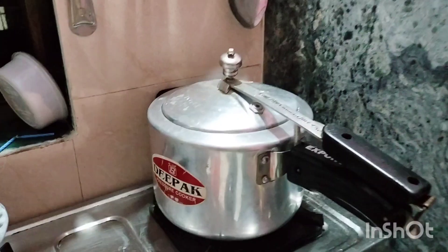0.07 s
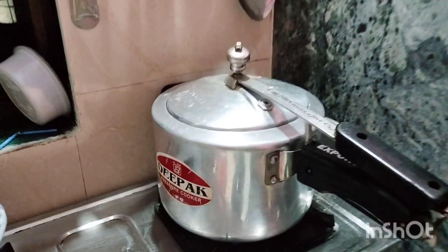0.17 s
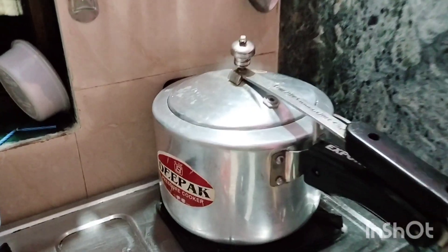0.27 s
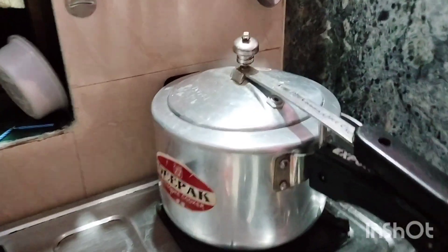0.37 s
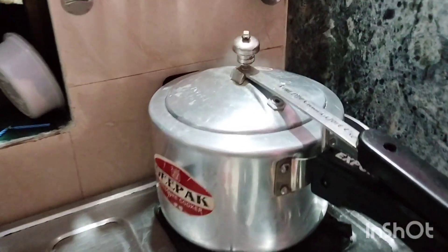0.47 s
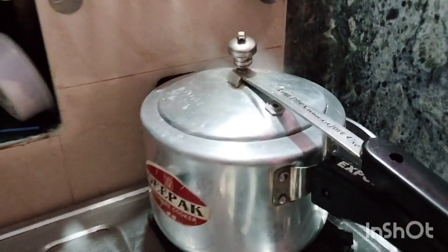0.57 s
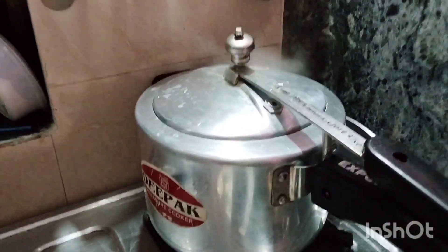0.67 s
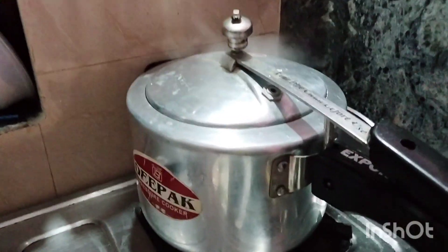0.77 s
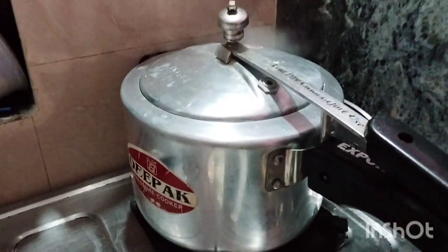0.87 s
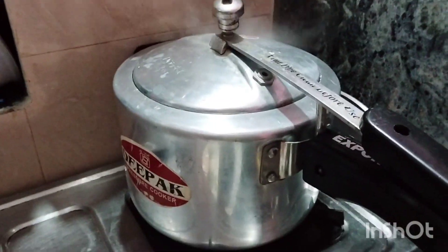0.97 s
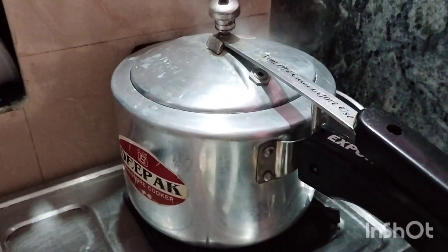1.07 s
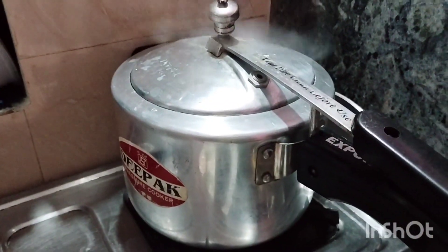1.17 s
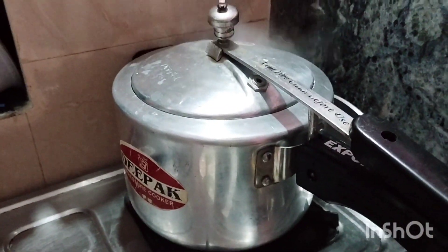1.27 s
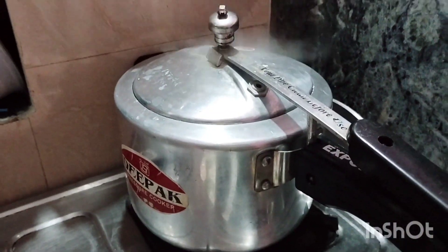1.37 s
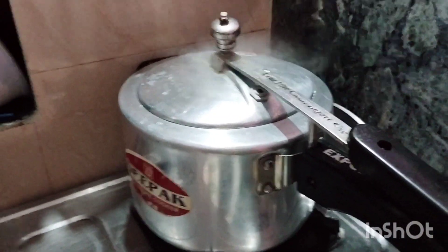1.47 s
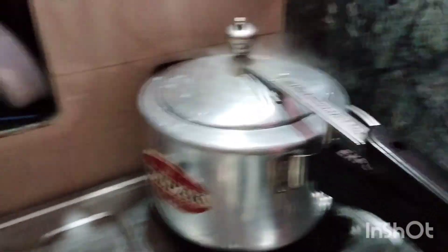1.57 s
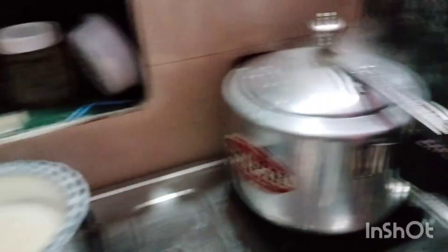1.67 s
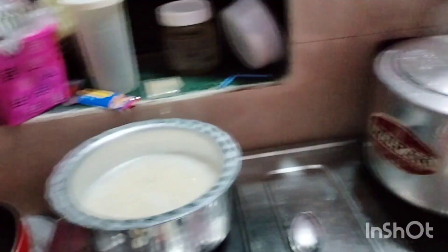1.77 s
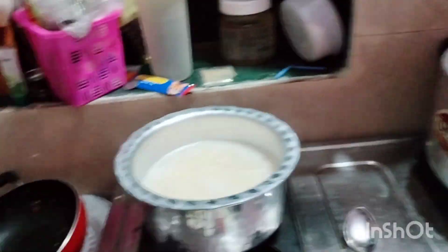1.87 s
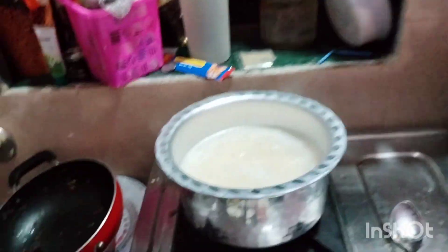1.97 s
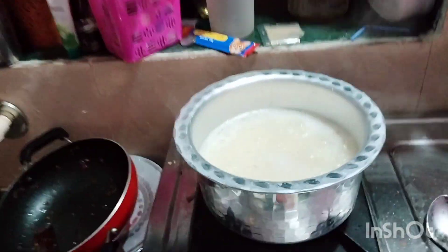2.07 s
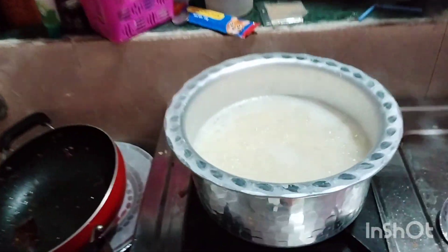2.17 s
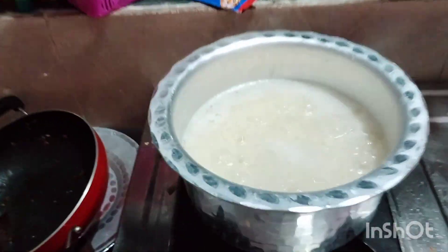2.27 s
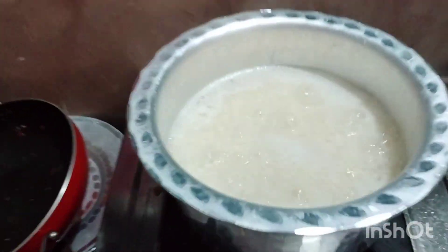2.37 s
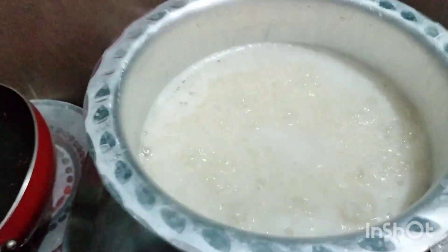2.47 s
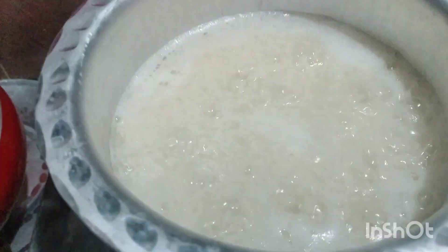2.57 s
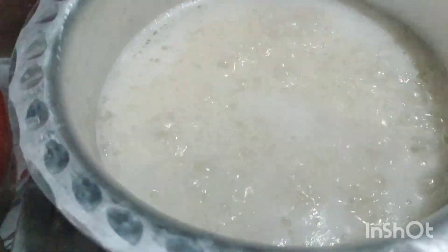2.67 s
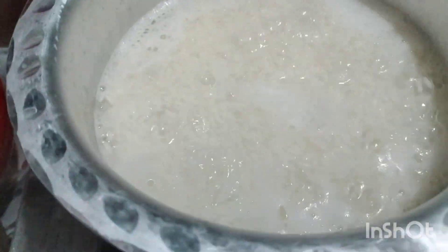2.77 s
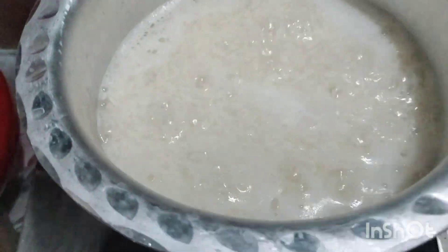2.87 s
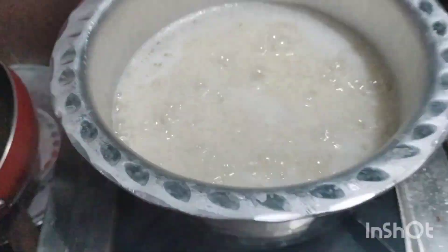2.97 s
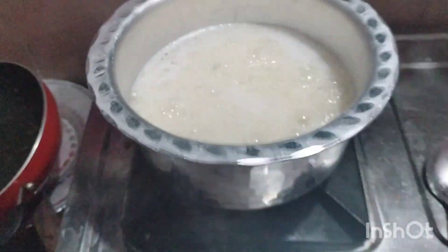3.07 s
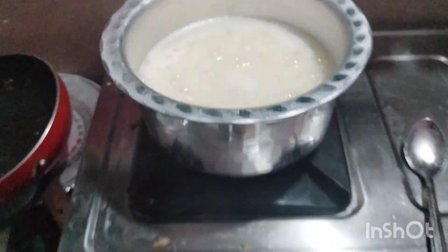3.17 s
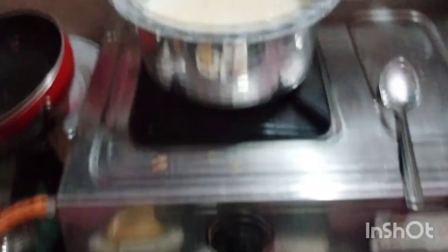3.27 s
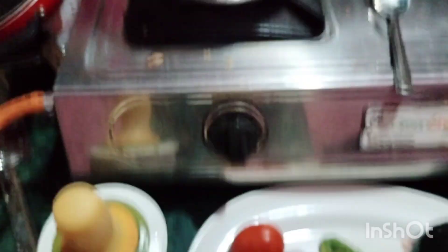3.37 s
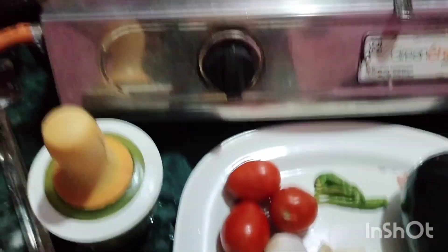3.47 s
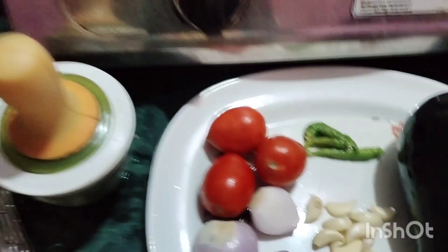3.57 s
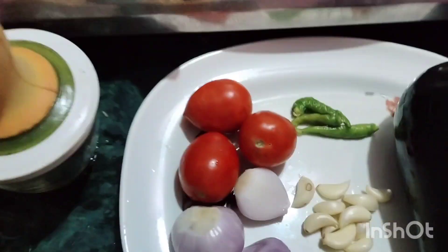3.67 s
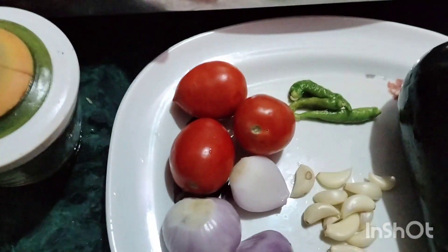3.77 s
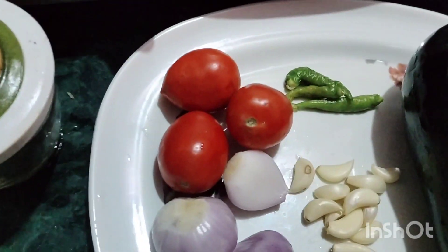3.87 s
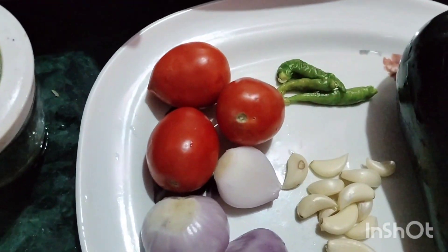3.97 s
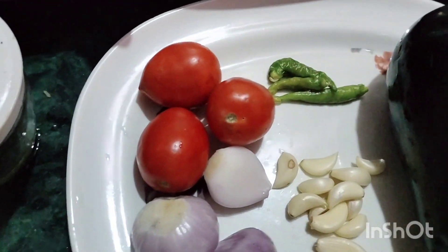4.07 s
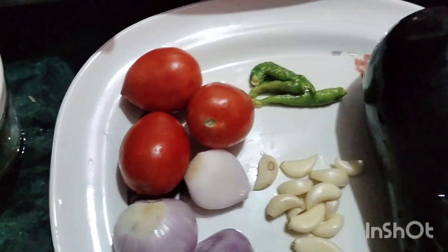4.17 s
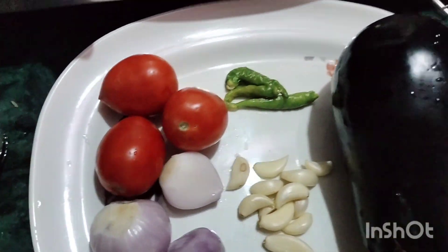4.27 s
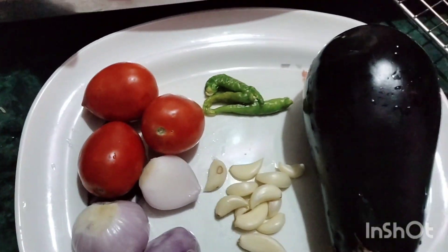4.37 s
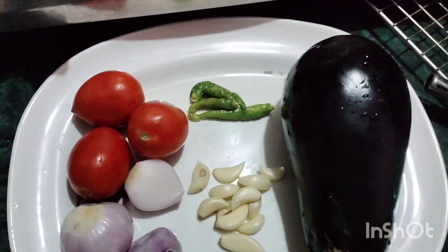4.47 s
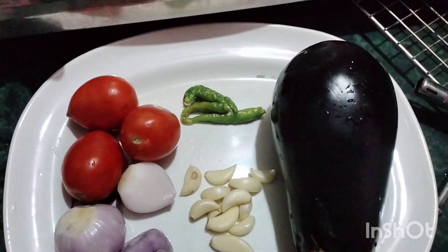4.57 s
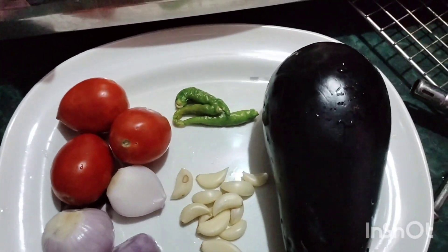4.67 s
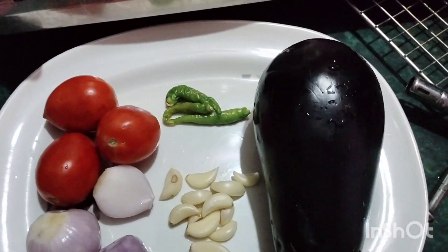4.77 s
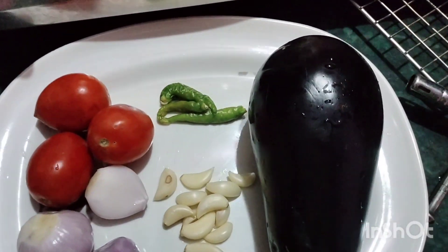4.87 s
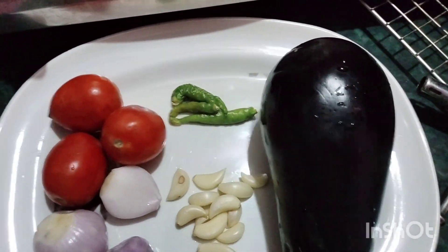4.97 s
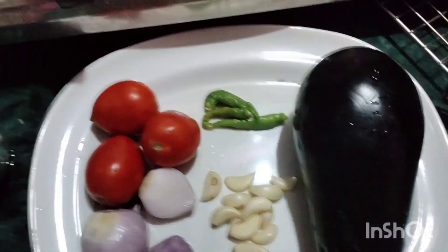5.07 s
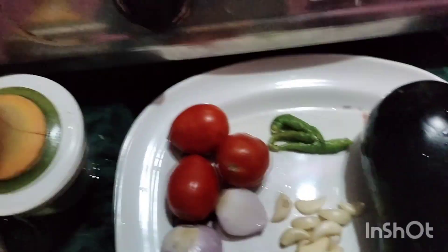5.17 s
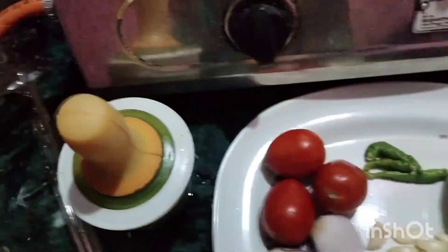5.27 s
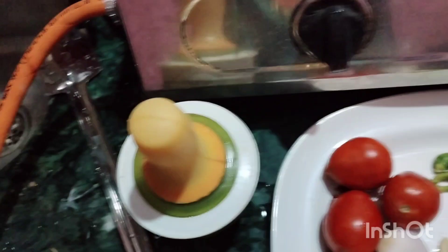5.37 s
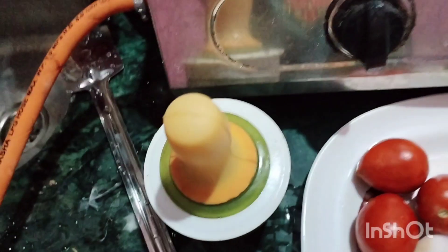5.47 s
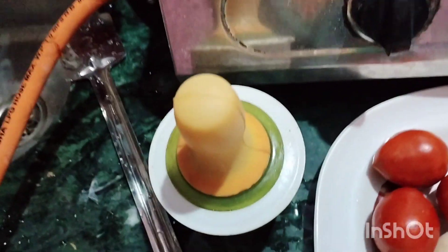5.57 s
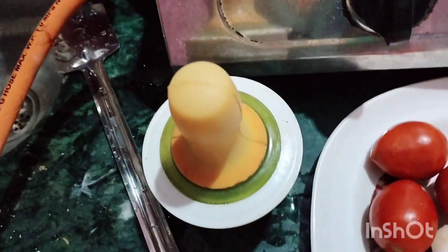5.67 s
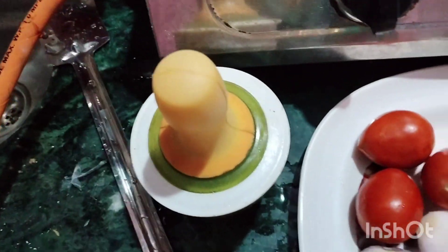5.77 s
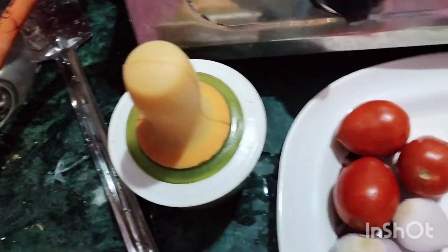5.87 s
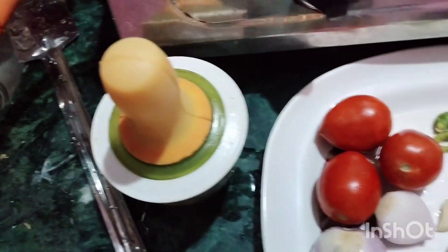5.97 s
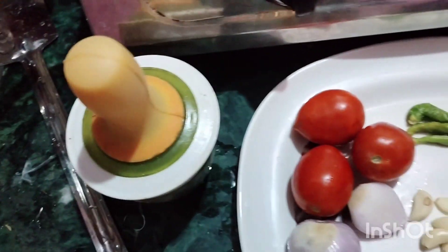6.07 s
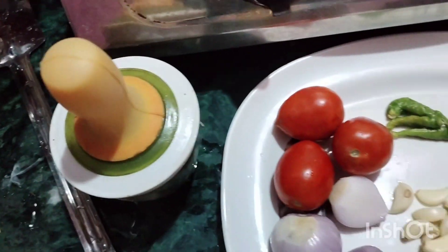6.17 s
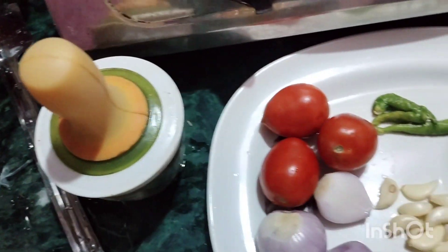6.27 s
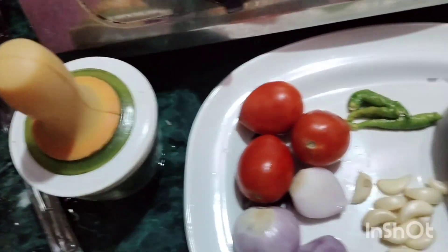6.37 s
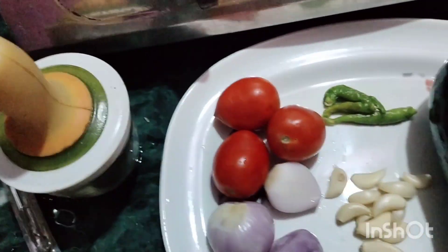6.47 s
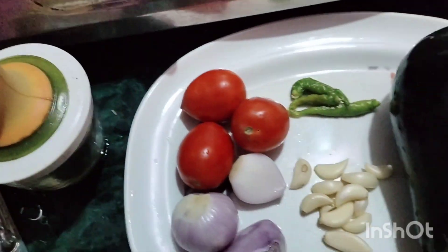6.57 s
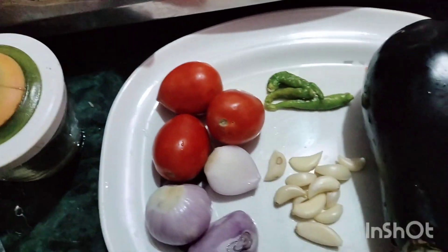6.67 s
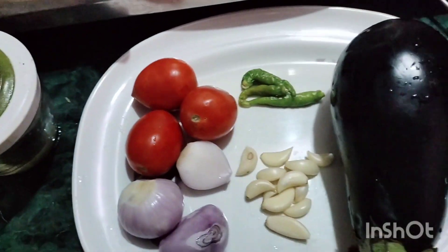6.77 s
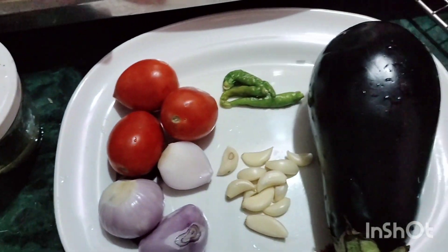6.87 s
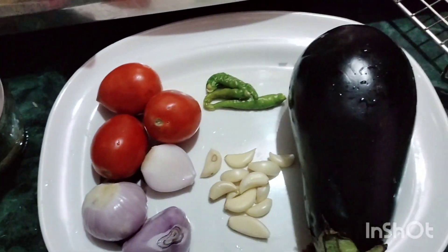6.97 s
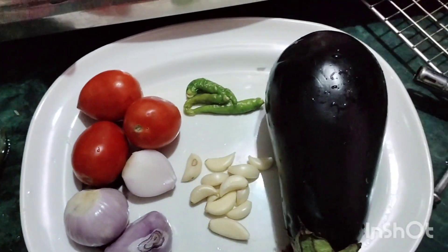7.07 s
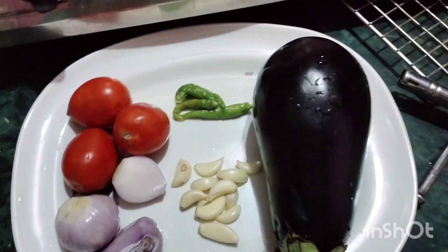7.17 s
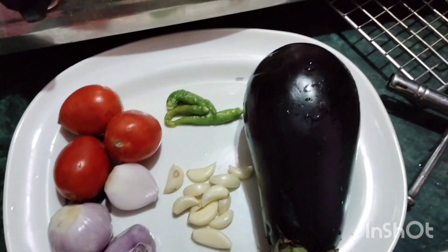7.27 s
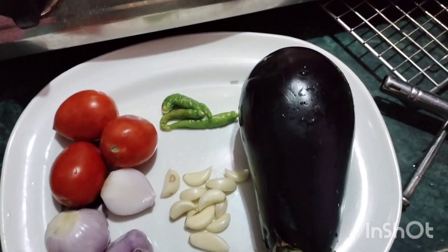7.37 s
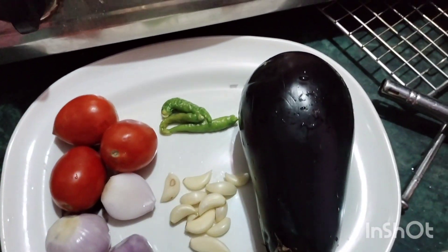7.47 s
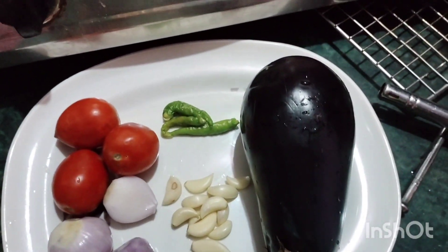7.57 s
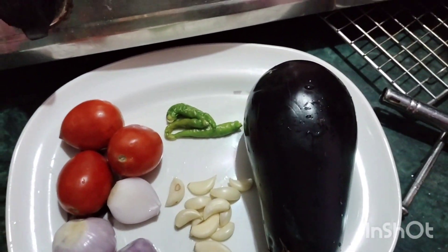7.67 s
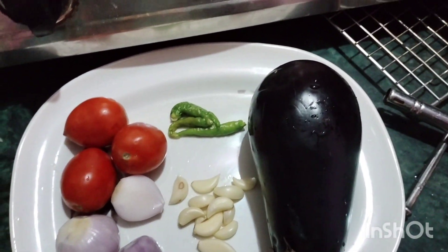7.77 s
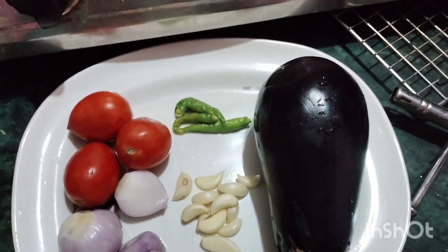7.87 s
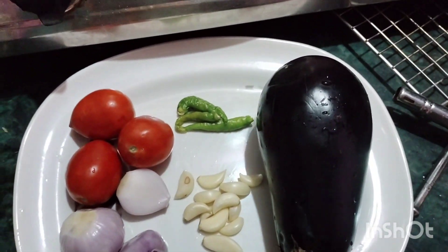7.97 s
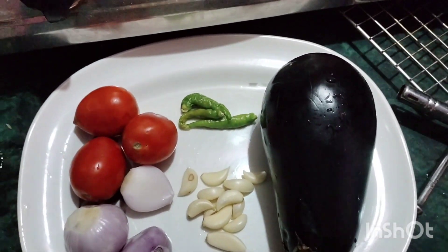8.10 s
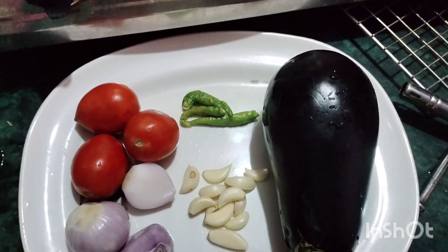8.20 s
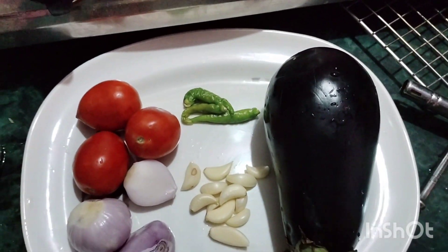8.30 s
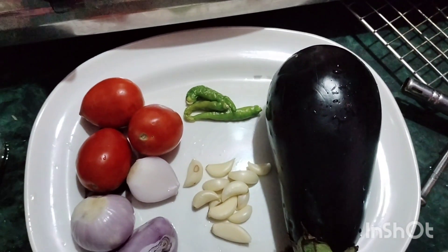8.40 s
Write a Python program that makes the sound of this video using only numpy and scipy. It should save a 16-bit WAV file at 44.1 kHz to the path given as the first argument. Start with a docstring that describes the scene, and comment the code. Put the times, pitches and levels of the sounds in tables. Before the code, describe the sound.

Bright, sputtering steam hiss from a pressure cooker valve, shifting in tone above a low burner rumble and soft handling bumps.

```python
"""A bright, sputtering hiss cuts in: steam jets from the weight valve of a pressure cooker, 30 cm away.
The microphone is a hand-held phone in a small tiled kitchen; it swings over a simmering pot and settles
above the counter, a metre off. Its two ports colour the hiss differently, and wall echoes shift as it
moves. Underneath are the low roar of gas burners, a fuzzy drone that swells in the second half
and a few soft bumps of the hand."""
import sys
import numpy as np
from scipy import signal
from scipy.fft import rfft, irfft
from scipy.io import wavfile
from scipy.ndimage import uniform_filter1d

SR = 44100
rng = np.random.default_rng(int(sys.argv[2]) if len(sys.argv) > 2 else 0)


def put_to_file(sound):
    """Save the sound as 16-bit audio at rate SR, in the file named by the first command-line argument."""
    columns = np.atleast_2d(sound).T  # one column per channel
    safe = np.clip(columns, -1, 1)
    whole_steps = np.round(safe * 32767)
    wavfile.write(sys.argv[1], SR, whole_steps.astype(np.int16))


N = 371983
FRAME, OVERLAP = 1024, 768  # samples
HZ = np.fft.rfftfreq(FRAME, 1 / SR)
TIME = np.arange(N) / SR
SOUND_M_PER_S = 343


def steam_jet(sputter_db=1.0, surge_db=0.43, spits_per_s=120, spit_s=0.0004, spit_db=-4, direct=.45):
    """Turbulent steam at two ports: the flow flutters under the weight, droplets spit through the gap."""
    flow = gain_of(sputter_db * wander(68) + surge_db * wander(35))
    drops = (rng.random(N) < spits_per_s / SR) * np.minimum(rng.exponential(1, N), 4)
    spits = gain_of(spit_db) * signal.lfilter([1], [1, -np.exp(-1 / (spit_s * SR))], drops)
    noise = rng.standard_normal((3, N))
    # the direct share reaches both ports, the rest is diffuse
    steam = np.sqrt(direct) * noise[2] + np.sqrt(1 - direct) * noise[:2]
    return steam * flow * np.sqrt((1 + spits) / (1 + spits.mean()))


# The jet's base colour at the open left port. Each row: frequency in Hz, level in dB per Hz.
LEFT_HISS = [(500, -85.5), (1100, -77.5), (1500, -73.5), (1900, -70.5), (2500, -66), (3300, -66),
             (4900, -66.5), (5700, -64.5), (7600, -66), (8300, -66.5), (9700, -65), (11400, -62.5),
             (13000, -64.5), (13600, -67), (15500, -65)]
# Steady narrow resonances on it. Each row: centre in Hz, width in Hz, lift in dB.
HISS_RINGS = [(7650, 150, 1.5), (10470, 180, 3.8), (12650, 170, 1.8)]
# Top treble beamed at the microphone. Each row: time in seconds, level in dB (neutral at flat_db).
TREBLE_BEAM = [(0.65, -34), (1.34, -31), (2.69, -38), (3.38, -35), (4.53, -38), (5.4, -36.5), (8.39, -42),
               (8.43, -38)]


def left_port(steam, flat_db=-36.5, glide_hz_per_m=7640):
    """Wide hiss with narrow rings; the top octave beams from the valve and a reflection peak glides."""
    t, spectra = to_frames(steam)
    distance_m, = follow(MIC_DISTANCE, t)
    top_db, = follow(TREBLE_BEAM, t)
    colour_db = spectrum(LEFT_HISS) + sum(db * bell(hz, width) for hz, width, db in HISS_RINGS)
    top = np.clip((HZ - 9500) / 6000, 0, 1)
    beam_db = (top_db - flat_db) * top
    body_db = by_distance(t, 1.5, -0.17) * (1 - top)
    low_mid_db = by_distance(t, -0.5, 3.3) * bell(1130, 180)
    glide_db = 1.5 * bell(glide_hz_per_m * distance_m, 1030)  # a grazing reflection lifts one band
    room_db = glide_db + standing_waves(t) + patches(t) + echoes(t)
    return to_sound(spectra * gain_of(colour_db + beam_db + body_db + low_mid_db + room_db))


# The jet's base colour at the right port. Each row: frequency in Hz, level in dB per Hz.
RIGHT_HISS = [(500, -75.5), (1050, -80.5), (1250, -74.5), (1800, -71), (2200, -63.5), (3000, -68.5),
              (4400, -70), (5600, -74.5), (6800, -88), (7800, -75), (8600, -67), (11400, -68.5),
              (12500, -77), (14000, -81), (15500, -85)]
# Thin valve whistles. Each row: centre in Hz, width in Hz, dB by the valve, dB over the counter.
VALVE_WHISTLES = [(2730, 20, -1, 4), (2976, 35, -2, 6.5), (3620, 35, 5, 1), (11204, 15, 4, 3)]
# A reflection cancels a band that rises as the phone turns.
# Each row: time in seconds, centre in Hz, gain in dB.
REFLECTION_NOTCH = [(1.6, 2960, -1), (2.0, 3100, 2), (4.6, 3200, -5), (5.0, 4200, -10), (5.6, 4600, -27),
                    (6.6, 4940, -15), (8.43, 5460, -9)]
# The phone's angle to the valve. Each row: time in seconds, extra path to the right port in metres.
RIGHT_EXTRA_PATH = [(0.63, 0.039), (1.55, 0.038), (1.9, -0.043), (2.4, -0.0795), (3.0, -0.091),
                    (3.7, -0.027), (6.3, -0.027), (7.0, 0.012)]


def right_port(steam):
    """Hiss and whistles heard through a duct, a little earlier or later than at the left port."""
    t, spectra = to_frames(steam)
    extra_m, = follow(RIGHT_EXTRA_PATH, t)
    notch_hz, notch_db = follow(REFLECTION_NOTCH, t)
    colour_db = spectrum(RIGHT_HISS) + right_treble(t)
    whistles_db = sum(by_distance(t, near, far) * bell(hz, width)
                      for hz, width, near, far in VALVE_WHISTLES)
    low_mid_db = by_distance(t, -0.5, 3.3) * bell(1430, 170)
    shade_db = by_turn(t, -4, 1.7) * bell(7060, 270)  # a dark band fills as the port faces the valve
    room_db = notch_db * bell(notch_hz, 290) + echoes(t)
    lag = np.exp(-2j * np.pi * HZ * extra_m / SOUND_M_PER_S)
    return to_sound(spectra * lag * gain_of(colour_db + whistles_db + low_mid_db + shade_db + room_db))


# The hiss's broad mid-treble hump sounds lower and weaker as the phone turns away, then partly returns.
# Each row: time in seconds, centre in Hz, lift in dB.
MID_TREBLE_HUMP = [(0.63, 3700, 15.5), (1.55, 3550, 14.5), (1.75, 2700, 7), (2.0, 2320, 4), (3.4, 2400, 4),
                   (4.4, 2600, 1), (6.3, 2950, 5.5), (6.9, 2740, 8.5), (7.3, 2980, 11.5), (8.43, 3167, 10)]
# The right port swings through the jet's beam. Each row: time and width in seconds, treble lift in dB.
BEAM_FLARES = [(1.95, 0.33, 3.5), (5.4, 0.51, 2)]


def right_treble(t):
    """A mid-treble hump and the duct's high resonance stand out (dB) when the port faces the cooker."""
    hump_hz, hump_db = follow(MID_TREBLE_HUMP, t)
    hump, resonance = bell(hump_hz, 640), bell(11180, 1360)
    treble = np.clip((HZ - 2000) / 3000, 0, 1)
    flare_db = sum(db * passing(t, s, width_s) for s, width_s, db in BEAM_FLARES)
    treble_db = by_distance(t, 1, -0.4) + flare_db * (1 - 0.78 * resonance)  # the resonance flares less
    return treble_db * treble + hump_db * hump + by_turn(t, 6, 1.13) * resonance


# Two lasting standing waves at the left port.
# Each row: centre in Hz, width in Hz, lift in dB by the valve, lift in dB over the counter.
STANDING_BANDS = [(4080, 250, 6, 2.5), (6390, 260, 3.5, 4)]
# Others, crossed on the way. Each row: time and width in seconds, centre in Hz, lift in dB.
CROSSED_BANDS = [(1.903, 0.078, 4260, 4.5), (2.02, 0.092, 6300, 5.5), (2.25, 0.22, 4630, 5),
                 (2.395, 0.08, 5540, 7), (2.75, 0.36, 6230, 6.5), (2.95, 0.34, 3520, 4), (4.0, .2, 7150, 8),
                 (4.05, 0.13, 6100, 4.5), (4.85, 0.51, 7600, 6), (4.904, 0.35, 3980, 4.5),
                 (5.85, 0.2, 6100, 2.5)]


def standing_waves(t):
    """Narrow bands sing out (dB) where the microphone sits in a standing wave or crosses one."""
    lasting_db = sum(by_distance(t, near, far) * bell(hz, width) for hz, width, near, far in STANDING_BANDS)
    crossed_db = sum(db * passing(t, s, width_s) * bell(hz, 200) for s, width_s, hz, db in CROSSED_BANDS)
    return lasting_db + crossed_db


def patches(t, depth_db=1.15, patch_s=.3, patch_hz=450):
    """Standing waves between pots and walls: random bands swell and fade (dB) as the phone passes."""
    field = rng.standard_normal((len(t), len(HZ)))
    for _ in range(2):
        field = uniform_filter1d(field, round(patch_s / (t[1, 0] - t[0, 0])), axis=0)
        field = uniform_filter1d(field, round(patch_hz / HZ[1]), axis=1)
    return depth_db * field / field.std() * np.clip(HZ / 5000, 0, 1)


def echoes(t, ripple_db=3.5, spread_s=.018, sway_m=0.012, drift_m_per_s=.09, count=40):
    """Echoes off tiles and pots ripple the spectrum (dB); each path shifts as the hand moves and sways."""
    distance_m, = follow(MIC_DISTANCE, t)
    ripple = np.zeros((len(t), len(HZ)), np.float32)
    for place, slant, phase, sway_rate in rng.random((count, 4)):
        travel_m = (2 * slant - 1) * (distance_m + drift_m_per_s * t)
        path_m = travel_m + sway_m * np.sin(2 * np.pi * (2 * sway_rate * t + phase))
        delay_s = .003 + spread_s * place ** 2 + path_m / SOUND_M_PER_S
        ripple += np.cos((2 * np.pi * (HZ * delay_s + phase)).astype(np.float32))
    return ripple_db * ripple / np.sqrt(count / 2)


# The microphone by the cooker, over the pot, then over the counter.
# Each row: time in seconds, distance from the valve in metres.
MIC_DISTANCE = [(1.55, 0.31), (2.2, .6), (3.25, 0.66), (3.75, 0.78), (4.8, 0.89), (8.43, 1)]


def by_distance(t, near_db, far_db, near_m=.3, far_m=.95):
    """A gain that moves from near_db to far_db, by equal steps for each doubling of the distance."""
    distance_m, = follow(MIC_DISTANCE, t)
    return near_db + (far_db - near_db) * np.log(distance_m / near_m) / np.log(far_m / near_m)


# Which port is offered to the valve. Each row: time in seconds, the left port's lead in dB.
MIC_TURN = [(0.65, -10.0), (0.84, -8.5), (1.52, -8.5), (1.67, -1), (3.12, 2.5), (3.2, 0.5), (3.64, 4),
            (4.68, 10), (4.98, 6), (5.13, 9.5), (5.33, 4.5), (5.37, 6.5), (6.76, 3.5), (7.15, -1),
            (7.86, -2), (8.43, 0.5)]


def by_turn(t, even_db, slope):
    """A gain that grows as the right port turns towards the valve."""
    left_lead_db, = follow(MIC_TURN, t)
    return even_db - slope * left_lead_db


# Gas burners and room. Each row: frequency in Hz, level in dB per Hz.
BURNER_ROAR = [(15, -77), (35, -82), (62, -73), (82, -63.5), (103, -62.5), (145, -73), (225, -76.5),
               (270, -67), (330, -72), (410, -71.5), (600, -78), (900, -77.5), (1200, -103.5), (2500, -100)]
# How alike the two ports hear it. Each row: frequency in Hz, coherence from 0 to 1.
ROAR_COHERENCE = [(25, 0.9), (70, 0.9), (120, 1), (400, 0.93), (700, 0.6), (1200, 0)]
# Its balance. Each row: frequency in Hz, left minus right in dB.
ROAR_PAN = [(30, 9), (65, 2), (120, 1.5), (480, 1.5), (750, 12.5), (1000, -6), (1200, -25)]
# A low drone in the room. Each row: time in seconds, gain on the roar at drone_hz in dB.
ROOM_DRONE = [(0.6, -11), (3.2, -6), (3.8, 10), (5.2, 19.5), (6.8, 18), (8.43, 8)]
# Deep rumble. Each row: time in seconds, level in dB (only its swing about the mean counts).
DEEP_RUMBLE = [(0.7, -49), (0.81, -52.5), (4.27, -47), (5.11, -53), (5.54, -44.5), (6.17, -48.5),
               (6.99, -48), (8.43, -45)]


def burners(flicker_db=1.2, drone_hz=356):
    """Gas flames: a flickering low roar with a fuzzy drone, nearly the same at both ports."""
    flame = gain_of(flicker_db * wander(7))
    t, common = to_frames(flame * rng.standard_normal(N))
    _, separate = to_frames(flame * rng.standard_normal(N))
    same, pan_db = np.clip(spectrum(ROAR_COHERENCE), 0, 1), spectrum(ROAR_PAN)
    drone_db, = follow(ROOM_DRONE, t)
    rumble_db, = follow(DEEP_RUMBLE, t)
    swing_db = (rumble_db - rumble_db.mean()) * bell(57, 59)
    roar = gain_of(spectrum(BURNER_ROAR) + drone_db * bell(drone_hz, 9.6) + swing_db)
    left = common * roar * gain_of(pan_db / 2)
    right = (same * common + np.sqrt(1 - same ** 2) * separate) * roar * gain_of(-pan_db / 2)
    return np.array([to_sound(left), to_sound(right)])


# The hand on the phone, right at the microphone.
# Each row: time in seconds, left level in dB, pitch in Hz, left minus right in dB.
HAND_BUMPS = [(3.025, -34.5, 123, -1), (3.569, -25, 55.4, 23), (4.22, -26, 58.6, 18), (5.95, -30, 62.4, 15),
              (6.71, -33, 60, 9)]


def handling(swell_s=0.0062):
    """Each bump of the hand is a few dull cycles, mostly at the left port."""
    bumps = np.zeros((2, N))
    for s, db, hz, side_db in HAND_BUMPS:
        age = np.maximum(TIME - s + swell_s, 0)
        push = age / swell_s * np.exp(1 - age / swell_s) * np.sin(2 * np.pi * hz * age)
        bumps += gain_of([[db], [db - side_db]]) * push
    return bumps


def gain_of(db):
    """Decibels to amplitude."""
    return 10 ** (np.asarray(db) / 20)


def spectrum(points):
    """Points joined by straight lines on a log-frequency axis."""
    hz, value = np.transpose(points)
    return np.interp(np.log(HZ + 1), np.log(hz + 1), value)


def follow(rows, t):
    """The columns of a curve at the times t."""
    s, *columns = np.transpose(rows)
    return [np.interp(t, s, column) for column in columns]


def bell(centre_hz, width_hz):
    """The shape of a resonance on a dB scale, height 1."""
    return np.exp(-.5 * ((HZ - centre_hz) / width_hz) ** 2)


def passing(t, s, width_s):
    """A smooth rise and fall around the time s, height 1."""
    return np.exp(-.5 * ((t - s) / width_s) ** 2)


def wander(rate_hz):
    """Random motion of rms 1 that falls off above the given rate."""
    hz = np.fft.rfftfreq(N, 1 / SR)
    motion = irfft(rfft(rng.standard_normal(N)) / (1 + (hz / rate_hz) ** 2), N)
    return motion / motion.std()


def to_frames(x):
    """Frame times (column) and short-time spectra (frames x bins); unit noise gives 0 dB per Hz."""
    _, t, spectra = signal.stft(x * np.sqrt(SR / 2), SR, nperseg=FRAME, noverlap=OVERLAP)
    return t[:, None], spectra.T


def to_sound(spectra):
    """Short-time spectra back to samples."""
    return signal.istft(spectra.T, SR, nperseg=FRAME, noverlap=OVERLAP)[1][:N]


def scene():
    """Steam at both ports, over the burners and the hand."""
    left, right = steam_jet()
    return np.array([left_port(left), right_port(right)]) + burners() + handling()


def record(dry, start_s=0.628, edge_hz=15760):
    """The microphone opens abruptly and passes nothing above the band edge."""
    opened = np.clip((TIME - start_s) / .002, 0, 1)
    lowpass = signal.firwin(511, edge_hz, window=("kaiser", 9), fs=SR)
    return signal.oaconvolve(dry * opened, lowpass[None], "same")


dry = scene()
out = record(dry)
put_to_file(out)
```